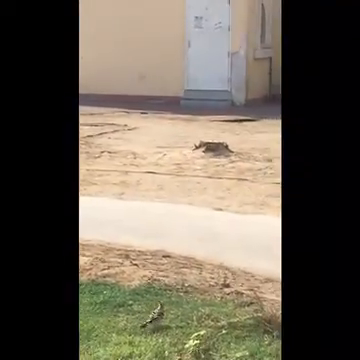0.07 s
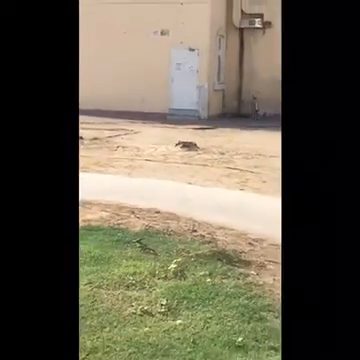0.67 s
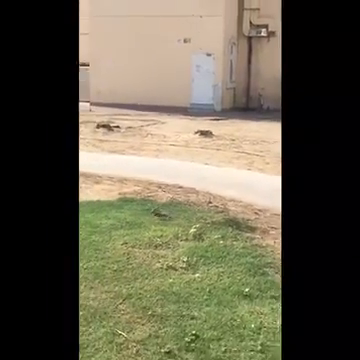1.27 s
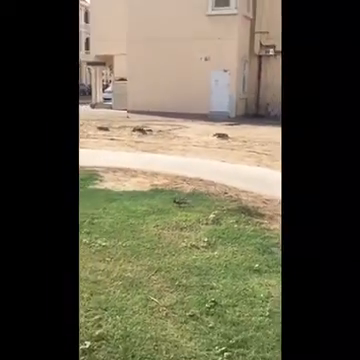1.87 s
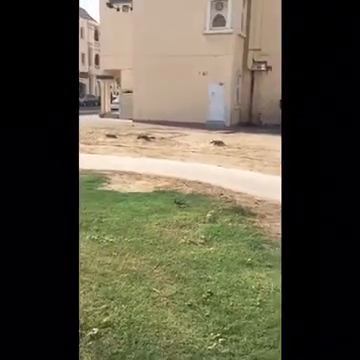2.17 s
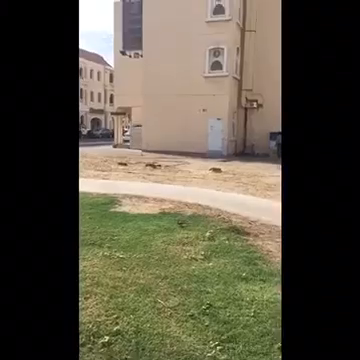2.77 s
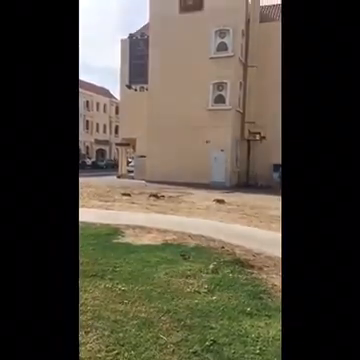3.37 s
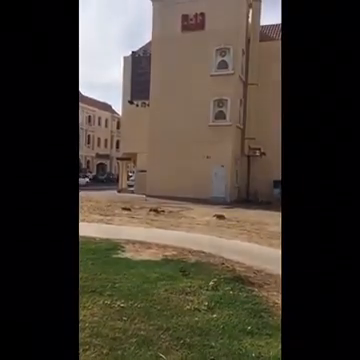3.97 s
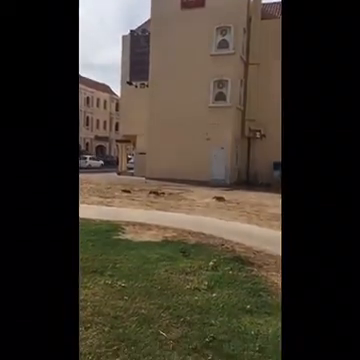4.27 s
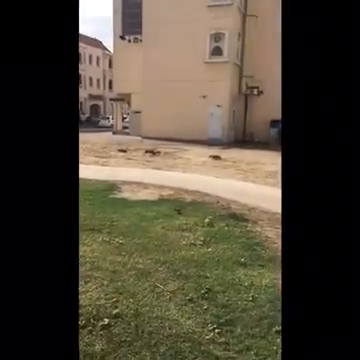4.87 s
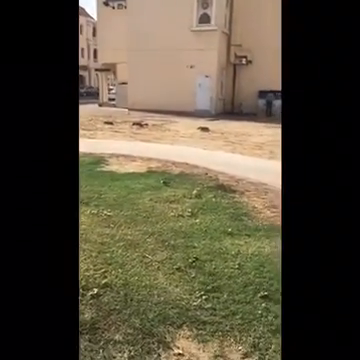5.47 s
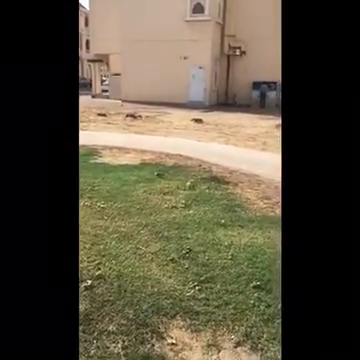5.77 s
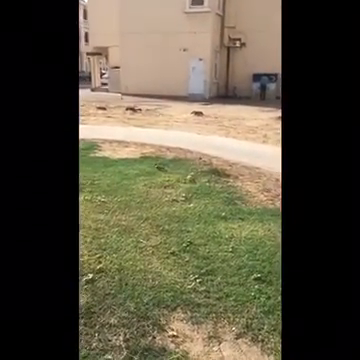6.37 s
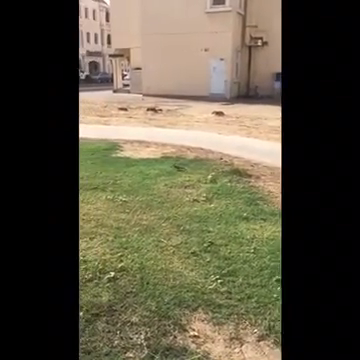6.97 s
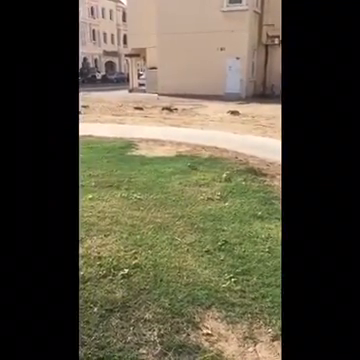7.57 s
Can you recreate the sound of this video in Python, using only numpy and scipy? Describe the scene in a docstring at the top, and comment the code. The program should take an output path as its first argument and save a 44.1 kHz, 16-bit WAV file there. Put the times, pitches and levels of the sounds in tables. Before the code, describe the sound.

Small birds give a few falling whistles and a run of quick high chirps, followed by occasional peeps, with faint twittering farther away. Underneath, far traffic rumbles and air conditioners hum softly throughout. In the second half, a distant car emerges with a mild tyre roar and a deep engine drone that swells toward the end. A phone microphone picks this up in an open residential yard with slight wall echo.

```python
"""A lawn between apartment blocks. Throughout, two air conditioners at nearly the same speed beat over
distant traffic, with soft rustles and a phone's faint high ticks. Small birds, echoed by the walls,
whistle first, chirp until 2.8 s, then mostly peep; a far flock twitters behind them. At 4.6 s a car
clears the houses with tyre roar and a growl. Its engine booms near the end; a thin whine enters at 7.1 s."""
import sys
import numpy as np
from scipy import signal
from scipy.fft import rfft, irfft
from scipy.io import wavfile

SR = 44100
rng = np.random.default_rng(int(sys.argv[2]) if len(sys.argv) > 2 else 0)


def transcribe(u):
    """Save the signal u as a 16-bit wav file named by the first command-line argument.

    u: samples, shape (n,) or (channels, n), limited to [-1, 1]; the rate is SR.
    q: integer samples, one column per channel.
    """
    v = np.clip(np.atleast_2d(u).T, -1, 1)
    q = np.round(v * 32767).astype(np.int16)
    wavfile.write(sys.argv[1], SR, q)


N = 340452

# far road rumble: freq_hz, relative_db
RUMBLE_SPECTRUM = [(13, -45), (22, -28), (38, 3), (96, -1), (157, -6), (187, -5.5), (216, -6), (288, -9),
                   (312, -9.5), (384, -14.5), (457, -18.5), (487, -18.5), (520, -18.5), (1000, -22.5),
                   (1300, -62), (2200, -120)]
# far hiss of tyres and leaves: freq_hz, relative_db
HISS_SPECTRUM = [(700, -9.5), (1000, 5), (1500, 2), (2200, -5.5), (3200, -12.5), (4200, -18), (4900, -24.5),
                 (5600, -24.5), (7000, -29.5), (9600, -35.5), (10500, -45), (11500, -41.5), (15500, -49)]
# body of the hiss: time_s, level_db
HISS_BODY_LEVEL = [(0, -52.5), (1.5, -52.5), (2.4, -50.5), (3.3, -51.5), (4.8, -50), (5.5, -49), (6.2, -50),
                   (7.72, -50)]
# treble of the hiss: time_s, level_db
HISS_TREBLE_LEVEL = [(0, -66), (1.05, -67), (1.5, -63.5), (2.4, -63.5), (3.3, -65.5), (4.9, -63.5),
                     (5.6, -65), (6.15, -68.5), (7.72, -68.5)]
# soft rustles: start_s, length_s, centre_hz, level_db
RUSTLES = [(0.146, 0.34, 3300, -67), (2.22, .4, 5270, -73), (2.2, 0.4, 9700, -77), (3.26, .08, 8000, -70),
           (4.5, 1.6, 6360, -74.5), (5.6, 0.38, 4550, -68.5), (5.62, .36, 10500, -79),
           (6.2, 0.24, 3650, -64.5), (7.378, .12, 8010, -76)]
# far flock: time_s, level_db
FLOCK_LEVEL = [(0, -69), (.7, -68), (1.3, -63), (3.2, -63), (4.4, -62), (4.9, -75), (6.3, -67), (6.7, -90)]
# faster compressor: shaft_multiple, level_db
FAST_HARMONICS = [(2, -49.5), (4, -47.5), (6, -50.5), (8, -60)]
# slower compressor: shaft_multiple, level_db
SLOW_HARMONICS = [(2, -45.5), (4, -48.5)]
# tyre roar of the car: freq_hz, relative_db
TYRE_SPECTRUM = [(200, -1), (330, 8), (400, 1), (600, 2.5), (950, 3.5), (1200, -0.5), (1450, -1.5),
                 (2000, -10.5), (3000, -30), (5000, -46)]
# engine drone: time_s, firing_hz, level_db
ENGINE_TRACK = [(0, 65.1, -64), (2.8, 62.6, -62), (3.9, 59.5, -41), (5.4, 58, -45), (6.2, 64.4, -49),
                (6.6, 66.3, -39), (7.3, 65, -43), (7.72, 64.2, -39)]
# swells added to the drone: middle_s, length_s, level_db
ENGINE_BOOMS = [(.17, 0.13, -34.5), (5.357, .32, -36.5), (6.49, 0.41, -39), (7.317, 0.35, -34.5),
                (7.56, 0.65, -34)]
# falling whistles: start_s, length_s, start_hz, end_hz, level_db
WHISTLES = [(.245, .08, 2700, 2430, -56), (.365, .07, 2700, 2380, -55), (.67, .075, 3950, 2950, -57),
            (.705, .11, 3500, 2630, -61), (.812, .09, 3450, 2700, -55), (.965, .085, 4000, 3200, -57.5),
            (1.115, .06, 3650, 2850, -57)]
# rising chirps: start_s, centre_hz, level_db
CHIRPS = [(.85, 4000, -53), (1.039, 4080, -53), (1.136, 3980, -52), (1.23, 4100, -55), (1.335, 4300, -56),
          (1.42, 3880, -50.5), (1.52, 3850, -55), (1.55, 4080, -51), (1.759, 3950, -57), (1.871, 4000, -57),
          (1.98, 3900, -55), (2.095, 3850, -52.5), (2.135, 4020, -54), (2.255, 3900, -54),
          (2.38, 3850, -65), (2.48, 3870, -52), (2.575, 3950, -58), (2.772, 4300, -53)]
# held peeps: start_s, length_s, pitch_hz, level_db
PEEPS = [(.105, .05, 4330, -59), (.385, .04, 4550, -59), (.59, .055, 4280, -57), (2.925, .04, 3560, -50.5),
         (3.035, .035, 4300, -54), (3.37, .035, 4300, -54), (3.435, .14, 3710, -57), (3.47, .1, 3990, -61),
         (3.97, .08, 3930, -56), (4.045, .05, 3540, -58), (4.19, .04, 4290, -54), (4.28, .19, 4340, -59.5),
         (4.997, .025, 3590, -53), (5.025, .065, 3990, -55), (5.14, .1, 3660, -57), (5.615, .05, 3460, -58),
         (5.68, .08, 4000, -64), (5.94, .1, 3990, -55.5)]
# wall echoes: delay_s, gain_db
WALL_ECHOES = [(.036, -8), (0.104, -8), (0.201, -10)]

TIME_S = np.arange(N) / SR
FREQ_HZ = np.fft.rfftfreq(N, 1 / SR)


def undb(db):
    """Decibels to gain."""
    return 10 ** (np.asarray(db) / 20)


def unit(x):
    """Scale to rms 1."""
    return x / np.sqrt(np.mean(x ** 2))


def curves(table):
    """Value columns, interpolated linearly in time."""
    time_s, *columns = np.transpose(table)
    return [np.interp(TIME_S, time_s, column) for column in columns]


def swell(middle_s, length_s):
    """Smooth rise and fall, peak 1."""
    return np.cos(np.pi * np.clip((TIME_S - middle_s) / length_s, -.5, .5)) ** 2


def shaped_noise(gain):
    """White noise times a gain per frequency bin, rms 1."""
    return unit(irfft(rfft(rng.standard_normal(N)) * gain, N))


def walk(rate_hz):
    """Smooth random motion, rms 1."""
    return shaped_noise(np.exp(-(FREQ_HZ / rate_hz) ** 2) * (FREQ_HZ > 0))


def noise(spectrum):
    """Noise coloured by freq_hz, relative_db points; steep skirts outside them."""
    hz, db = np.transpose(spectrum)
    bin_hz = FREQ_HZ + 1
    skirts = np.minimum(bin_hz / hz[0], 1) * np.minimum(hz[-1] / bin_hz, 1)
    return shaped_noise(undb(np.interp(np.log(bin_hz), np.log(hz), db)) * skirts ** 4)


def band(centre_hz, width_hz):
    """Noise in one resonance."""
    return shaped_noise(1 / (1 + (2 * (FREQ_HZ - centre_hz) / width_hz) ** 2))


def add(out, start_s, sound):
    """Mix a short sound in at start_s."""
    i = max(int(start_s * SR), 0)
    out[i:i + len(sound)] += sound[:max(N - i, 0)]


def town(rumble_db=-37, low_cut_hz=37, split_hz=4200, top_db=-80):
    """Rumble of many far roads; hiss whose treble comes and goes with the breeze."""
    body_db, = curves(HISS_BODY_LEVEL)
    treble_db, = curves(HISS_TREBLE_LEVEL)
    rumble = noise(RUMBLE_SPECTRUM) * undb(rumble_db + .33 * walk(10))
    rumble = signal.sosfilt(signal.butter(8, low_cut_hz, "high", fs=SR, output="sos"), rumble)
    hiss = noise(HISS_SPECTRUM)
    dull = signal.sosfiltfilt(signal.butter(2, split_hz, fs=SR, output="sos"), hiss)
    steady_top = noise([(9500, -5.5), (12000, -2.5), (15500, -7.5)]) * undb(top_db)
    body = dull * undb(body_db + .46 * walk(11))
    treble = unit(hiss - dull) * undb(treble_db + .79 * walk(22))
    return rumble + body + treble + steady_top


def rustles(flicker_db=3.5):
    """Soft swells of bright, flickering noise."""
    out = np.zeros(N)
    for start_s, length_s, centre_hz, level_db in RUSTLES:
        size = int(length_s * SR)
        grain = band(centre_hz, width_hz=.21 * centre_hz) * undb(flicker_db * walk(50))
        add(out, start_s, grain[:size] * np.hanning(size) * undb(level_db))
    return out


def phone_ticks(first_s=.256, period_s=.3, pitch_hz=14700, decay_s=.0009, level_db=-61.5, scatter_db=2.5):
    """Tiny high ticks on a steady clock, uneven in strength."""
    out, t = np.zeros(N), np.arange(SR // 50) / SR
    tick = np.exp(-t / decay_s) * np.sin(2 * np.pi * pitch_hz * t)
    for start_s in np.arange(first_s, N / SR, period_s):
        add(out, start_s, undb(level_db + scatter_db * rng.standard_normal()) * tick)
    return out


def phone_whine(start_s=7.14, rise_s=.11, level_db=-81):
    """Thin noise band; fades in and holds."""
    fade_in = np.clip((TIME_S - start_s) / rise_s, 0, 1)
    return fade_in * band(centre_hz=12020, width_hz=235) * undb(level_db)


def yard(direct, t60_s=1.3, onset_s=.003, tail_db=-2.5):
    """Direct sound, distinct echoes off the house fronts, diffuse tail."""
    t = np.arange(2 * SR) / SR
    tail = rng.standard_normal(len(t)) * np.exp(-np.log(1000) * t / t60_s) * (1 - np.exp(-t / onset_s))
    response = tail / np.linalg.norm(tail) * undb(tail_db)
    for delay_s, gain_db in WALL_ECHOES:
        add(response, delay_s, undb([gain_db]))
    return direct + signal.fftconvolve(direct, response)[:N]


def flock(count=300, start_hz=4580, floor_hz=3827, sink_s=2.0, pitch_spread=.13, spread_db=4.5):
    """Far chirps, sinking in pitch over time, blurred twice between the walls."""
    out = np.zeros(N)
    level_db, = curves(FLOCK_LEVEL)
    for when, pitch, strength in rng.random((count, 3)):
        start_s = when * N / SR
        centre_hz = floor_hz + (start_hz - floor_hz) * np.exp(-start_s / sink_s)
        pitch_hz = centre_hz * (1 + pitch_spread * (pitch - .5))
        add(out, start_s, undb(spread_db * strength) * chirp(pitch_hz))
    return unit(yard(yard(out))) * undb(level_db)


def hum(pitch_hz, level_db, in_step_s=.76):
    """One line, wavering in moving air. Beats peak at in_step_s."""
    phase = 2 * np.pi * pitch_hz * (TIME_S - in_step_s) + .21 * walk(6.3)
    return unit(np.sin(phase)) * undb(level_db + 1.1 * walk(4.7))


def air_conditioners(fast_shaft_hz=47.416, slow_shaft_hz=47.04, fan_rise_db_per_s=.5):
    """Two compressors beat over mains hum; a fan tone grows above them."""
    fast = sum(hum(multiple * fast_shaft_hz, db) for multiple, db in FAST_HARMONICS)
    slow = sum(hum(multiple * slow_shaft_hz, db) for multiple, db in SLOW_HARMONICS)
    mains = hum(pitch_hz=100, level_db=-51)
    fan = hum(pitch_hz=492, level_db=-61 + fan_rise_db_per_s * TIME_S)
    return fast + slow + mains + fan


def car_growl(far_db=-64.5, swell_db=-51.5):
    """Low-mid drone; swells as the car clears the houses, then fades."""
    gain = undb(far_db) + undb(swell_db) * swell(middle_s=5.61, length_s=2.8)
    return band(centre_hz=359, width_hz=105) * gain


def car_tyres(clears_s=4.57, rise_s=.21, hidden_db=-66.5, clear_db=-50.5, surge_db=-48):
    """Tyre roar; opens up past the houses, surges briefly, grows as the car nears."""
    since_s = TIME_S - clears_s
    in_view = np.clip(since_s / rise_s, 0, 1)
    nearing_db = .9 * since_s
    surge = undb(surge_db) * swell(middle_s=5.02, length_s=.2)
    gain = undb(hidden_db) + in_view * undb(clear_db + nearing_db) + surge
    return noise(TYRE_SPECTRUM) * gain * undb(walk(10))


def car_exhaust(pitch_waver=.009, octave_db=-26):
    """Boom at the firing rate; overtones mostly lost over the distance."""
    firing_hz, level_db = curves(ENGINE_TRACK)
    booms = sum(undb(db) * swell(middle_s, length_s) for middle_s, length_s, db in ENGINE_BOOMS)
    phase = 2 * np.pi * np.cumsum(firing_hz * (1 + pitch_waver * walk(11))) / SR
    tone = unit(np.sin(phase) + undb(octave_db) * np.sin(2 * phase))
    return tone * (undb(level_db) + booms) * undb(walk(21))


def whistle(pitch_hz, quaver_depth=.012, jitter_hz=400, flutter_db=2.5):
    """Near-pure note along a pitch line, with slight quaver and flutter."""
    t = np.arange(len(pitch_hz)) / SR
    jitter = rng.standard_normal((2, 80))
    quaver, flutter = (np.interp(t * jitter_hz, np.arange(len(row)), row) for row in jitter)
    arch = np.sqrt(np.abs(np.sin(np.pi * t / t[-1])))
    phase = 2 * np.pi * np.cumsum(pitch_hz * (1 + quaver_depth * quaver)) / SR
    return arch * undb(flutter_db * flutter) * np.sin(phase)


def chirp(centre_hz, length_s=.0318, rise_hz=260):
    """Short pip sweeping up through centre_hz."""
    return whistle(centre_hz + rise_hz * np.linspace(-.5, .5, int(length_s * SR)))


def near_birds(fall_power=1.9, scoop_hz=50, scoop_s=.012):
    """Whistles that fall and ease off, rising chirps, peeps that scoop up to a held pitch."""
    out = np.zeros(N)
    for start_s, length_s, start_hz, end_hz, level_db in WHISTLES:
        fall = np.linspace(1, 0, int(length_s * SR)) ** fall_power
        add(out, start_s, undb(level_db) * whistle(end_hz + (start_hz - end_hz) * fall))
    for start_s, centre_hz, level_db in CHIRPS:
        add(out, start_s, undb(level_db) * chirp(centre_hz))
    for start_s, length_s, pitch_hz, level_db in PEEPS:
        scoop = np.exp(-np.arange(int(length_s * SR)) / SR / scoop_s)
        add(out, start_s, undb(level_db) * whistle(pitch_hz - scoop_hz * scoop))
    return out


def scene():
    """Mono sum of all sources."""
    traffic = town() + car_exhaust() + car_tyres() + car_growl()
    lawn = air_conditioners() + yard(near_birds()) + flock() + rustles()
    return (traffic + lawn + phone_ticks() + phone_whine())[None]


def record(dry):
    """The phone's steep low-pass."""
    cutoff_hz = 15700
    return signal.sosfilt(signal.ellip(10, .2, 80, cutoff_hz, fs=SR, output="sos"), dry)


dry = scene()
out = record(dry)
transcribe(out)
```